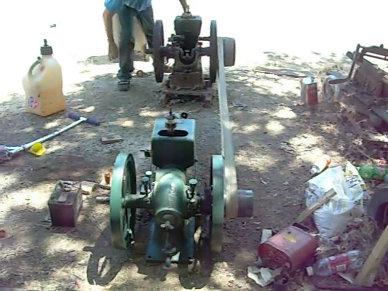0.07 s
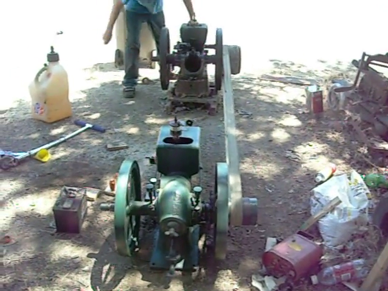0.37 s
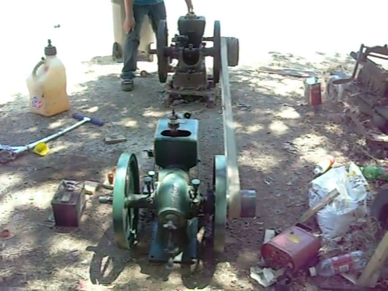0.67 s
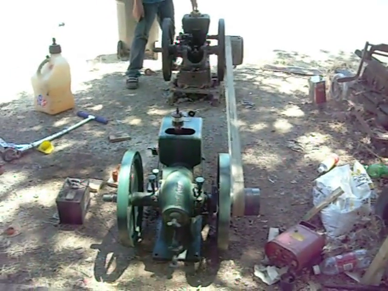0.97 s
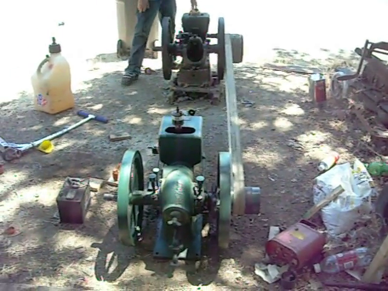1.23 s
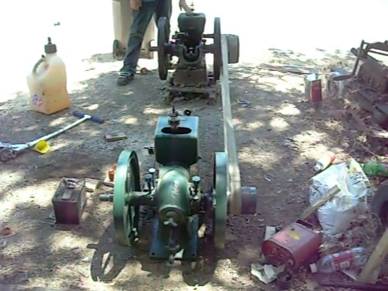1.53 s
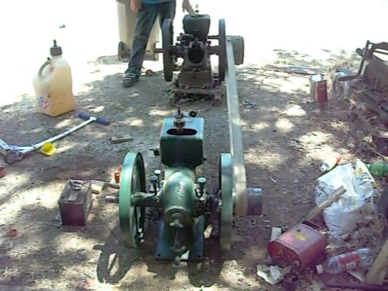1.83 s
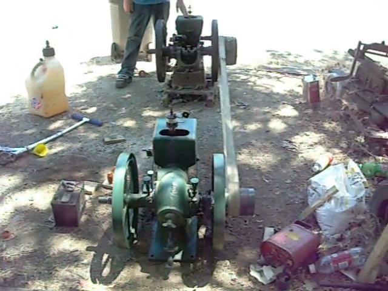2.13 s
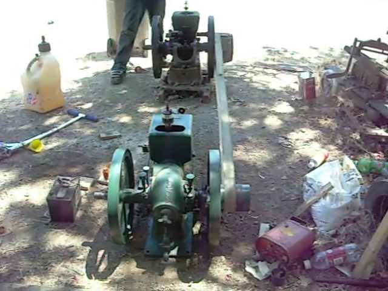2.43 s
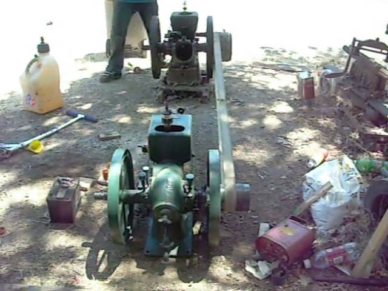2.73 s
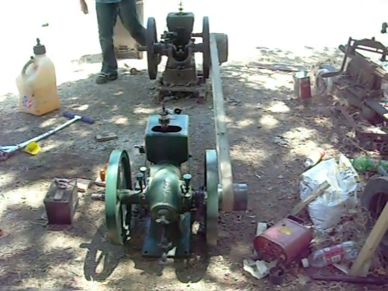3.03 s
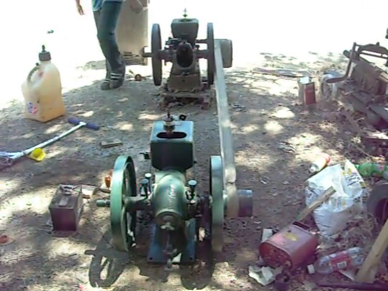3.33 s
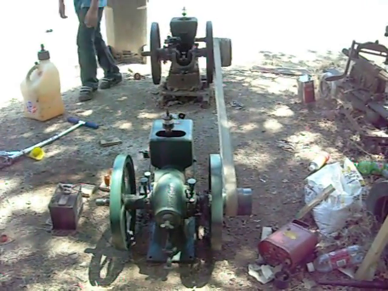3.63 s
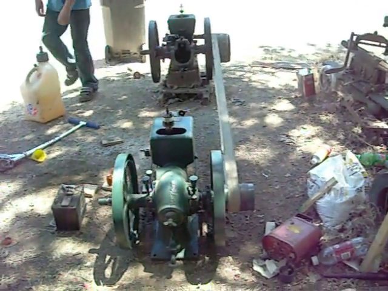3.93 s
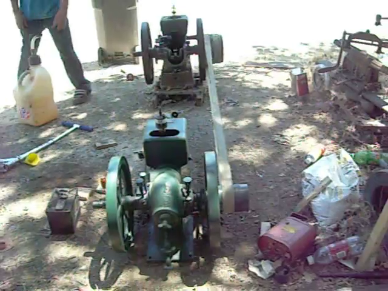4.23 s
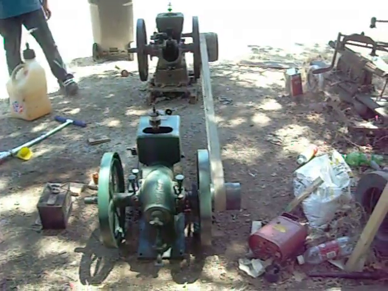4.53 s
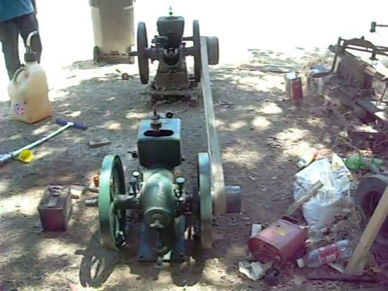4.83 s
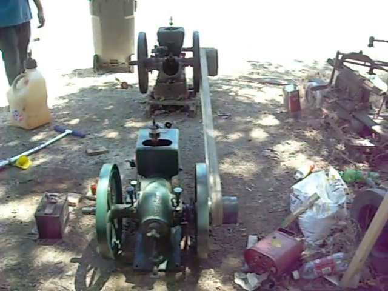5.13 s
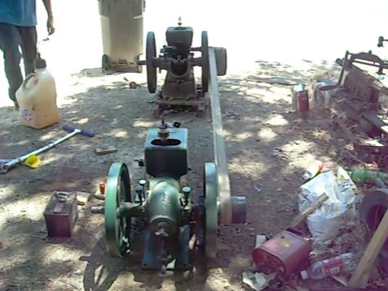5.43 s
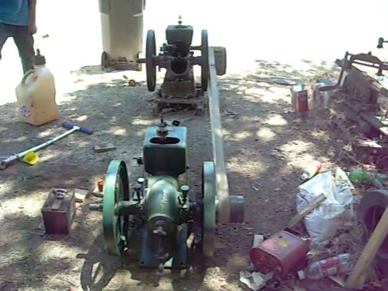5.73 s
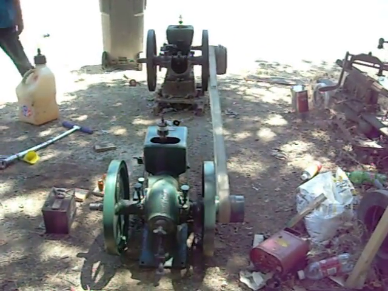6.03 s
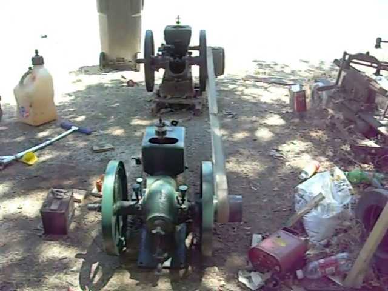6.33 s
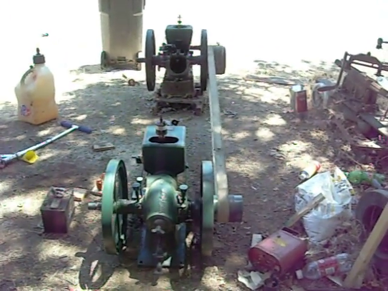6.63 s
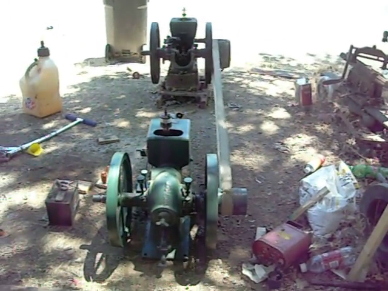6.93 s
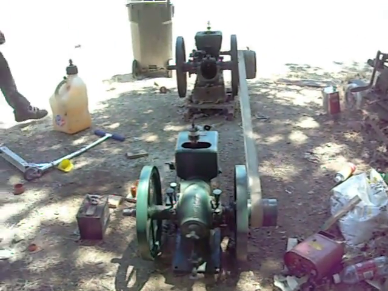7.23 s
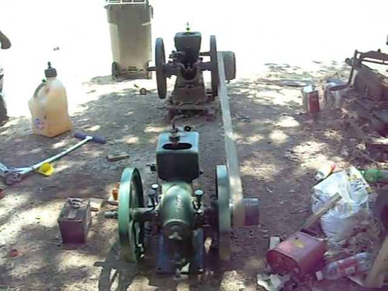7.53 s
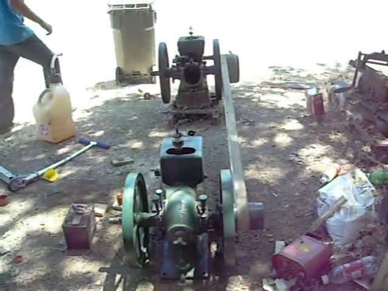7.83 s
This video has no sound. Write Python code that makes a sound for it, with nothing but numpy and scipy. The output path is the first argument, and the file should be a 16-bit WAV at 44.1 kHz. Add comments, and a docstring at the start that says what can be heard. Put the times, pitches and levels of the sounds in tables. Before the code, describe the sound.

Steady, even firing of an old stationary engine in a yard, with sharp exhaust barks, iron clatter and a faint belt whirr.

```python
"""Knock, bark and boom, about two and a half times a second: an old single-cylinder engine in a yard.
In each cycle, impacts excite the modes of the cast frame, tappet, valve and timing gears; escaping gas
rings the silencer's shell, lifts its lid and sets the air in the exhaust oscillating.
A loose steel part pings now and then over the whirr of belt and flywheels. The yard and far walls
reflect the sound, and a narrow-band microphone overloads on the loudest blows."""
import sys
import numpy as np
from scipy import signal
from scipy.fft import rfft, irfft, next_fast_len
from scipy.io import wavfile
from scipy.ndimage import map_coordinates

SR = 44100
rng = np.random.default_rng(int(sys.argv[2]) if len(sys.argv) > 2 else 0)


def dump_mix(stems):
    """Bounce the given channels to the path in sys.argv[1] as a 16-bit WAV at rate SR."""
    frames = np.atleast_2d(stems).T  # one column per channel
    limited = np.clip(frames, -1, 1)  # hard clip at full scale
    pcm = np.round(limited * 32767).astype(np.int16)
    wavfile.write(sys.argv[1], SR, pcm)


N = 356769
T = np.arange(SR // 3) / SR  # time within one blow, t/s

# frame impacts: t/s from the exhaust valve's opening, ring level/dB, crack level/dB, crack t60/s
FRAME_IMPACTS = [(-.1205, -30.5, -23.5, .03), (-.116, -15.5, 0, 0.027), (-.108, -26, -13, 0.071)]
# spectra of the cracks of valve and gears: f/Hz, relative density level/dB
VALVE_SPECTRUM = [(100, -20.5), (500, -28), (1400, -12.5), (2300, -14.5), (3100, -5), (4000, -21)]
GEAR_SPECTRUM = [(40, -32.5), (200, -15.5), (500, -4), (850, -5), (1550, 0), (2400, -5.5), (3100, -3),
                 (4000, -1)]


def bark():
    """Turbulent gas excites the silencer's shell resonances: a short blowdown, then the piston's sweep."""
    # gas rushing past the valve: f/Hz, relative density level/dB
    rush_spectrum = [(60, -47), (200, -16.5), (450, -14), (850, -10.5), (1500, -6.5), (2300, -7),
                     (3000, -3.5), (3600, -3.5), (4200, -2)]
    # shell resonances: f/Hz, bandwidth/Hz, peak gain/dB
    resonances = [(1110, 50, 6), (1550, 53, 3.5), (1690, 90, 0.5), (1973, 150, 5), (2400, 41, 1),
                  (2474, 45, 9.5), (2865, 170, 4.5), (3057, 110, 8), (3530, 200, 5), (3260, 190, 1.5),
                  (3650, 84, 6.5)]
    opens = valve_openings()
    shell = lambda hz: amp(sum(db / (1 + (2 * (hz - f0) / width) ** 2) for f0, width, db in resonances))
    gas = unit(filtered(noise(rush_spectrum, (len(opens), len(T))), shell))
    blowdown = held(level_db=-2.5, hold=.013, t60=.1)
    sweep = held(level_db=-24, hold=.1, t60=.1)
    delay_s, attack_s = .0028, .00057  # the valve lifts and the gas breaks out
    flow = np.maximum(blowdown, sweep) * (1 - np.exp(-T / attack_s))
    blast_db, _ = accents(opens)
    strength = amp(blast_db + .3 * rng.standard_normal(len(opens)))
    return placed(opens + delay_s, strength[:, None] * gas * flow)


def exhaust_boom():
    """Sudden release sets the exhaust's air in free oscillation; most gas leaves as one heavy shove."""
    # air modes at release, and the shove's pulse: f/Hz, level/dB, t60/s, rise/s
    air_modes = [(66.2, -11.5, 0.069, 0.0087), (127.6, -18.5, .13, .012), (161.3, -5.5, 0.13, 0.044),
                 (235.3, -32.5, 0.47, 0.00088), (254.2, -30, 0.32, .001), (276.4, -19, .16, 0.0026),
                 (320.8, -16.5, 0.096, 0.00044), (411, -26.5, 0.23, 0.00086)]
    shove = [(95, -13.5, 0.017, 0.0034), (28, -26, 0.095, 0.0014)]
    return puff(air_modes, delay=0, scatter_db=0 + 1.5) + puff(shove, delay=.012)


def exhaust_honk():
    """The piston's second push excites the air column again."""
    # air modes: f/Hz, level/dB, t60/s, rise/s
    air_modes = [(75, -30, 0.043, 0.0008), (257.3, -28, 0.073, 0.00073), (328, -9, 0.088, 0.0095),
                 (354.3, -29, 0.12, 0.0013)]
    return puff(air_modes, delay=.0655, scatter_db=2.2, jitter_s=.00058)


def puff(modes, delay, scatter_db=0, jitter_s=0):
    """Impulse response of an air column: a slug of gas starts damped oscillations in every cycle."""
    opens = valve_openings()
    swings = np.array([-damped(*mode) for mode in modes])
    sizes = amp(scatter_db * rng.standard_normal((len(opens), len(modes))))
    return placed(opens + delay + jitter_s * rng.standard_normal(len(opens)), sizes @ swings)


def lid():
    """Each blast's pressure lifts the silencer's lid, which clanks in its own modes."""
    # lid modes: f/Hz, level/dB, t60/s
    modes = [(1770, 7.5, 0.045), (2785, 2, 0.054)]
    opens = valve_openings()
    _, clank_db = accents(opens)
    db = -15 + clank_db + 2.5 * rng.standard_normal(len(opens))
    return placed(opens + .0073, amp(db)[:, None] * ringing(modes, rise=.0038))


def valve_openings():
    """The governor hunts, so the exhaust valve's opening times drift about an even beat."""
    # crank's lag behind the beat: t/s, lag/s
    hunting = [(.2, .0042), (2.23, -.0014), (2.63, -0.0046), (4.65, -0.00098), (5.6, 0.0037),
               (6.26, 0.0023), (7.06, -.0012), (7.47, 0.0023), (7.87, 0.0011)]
    first_s = .2224
    beat = first_s + CYCLE_S * np.arange(-1, N / SR / CYCLE_S)
    return beat + np.interp(beat, *np.transpose(hunting))


def accents(opens):
    """Cycle-to-cycle variation: level offsets of blast and lid, zero except on a few hard firings."""
    # hard firings: t/s, blast offset/dB, lid offset/dB
    hard_firings = [(1.028, 1.5, -1), (1.43, 0.5, 9.5), (2.233, .5, 3.5), (4.247, 2, -2.5),
                    (6.262, 3, -7.5), (7.064, 1.5, 0)]
    hard = np.array(hard_firings)
    same_cycle = np.abs(opens[:, None] - hard[:, 0]) < CYCLE_S / 2
    return (same_cycle @ hard[:, 1:]).T


def knock():
    """Structure-borne sound: the firing knock excites the modes of the cast frame."""
    # frame modes and crack spectrum: f/Hz, relative level/dB
    modes = [(759, -14.5), (1232, 2.5), (1324, -2), (1625, 6.5), (1857, -18.5), (2002, -5), (2153, 3),
             (2255, -19), (2444, 4.5), (2557, 2.5), (2858, 1), (2960, -6), (3143, -15.5), (3396, -26.5),
             (3445, -14.5), (3552, -1.5), (3622, 7.5), (3779, 2)]
    spectrum = [(30, -14), (170, -11), (380, -22.5), (750, -6), (1300, -6.5), (2600, -1), (3450, 3.5),
                (4200, -4)]
    return struck(FRAME_IMPACTS, modes, spectrum, t60=.09, rise=.0014, alike=.6, scatter_db=.4)


def jolt():
    """The firing's reaction force jolts the frame on its base: a heavily damped thud under the knock."""
    # modes of the frame on its base: f/Hz, level/dB, t60/s, rise/s
    modes = [(110, -25, 0.009, 0.00057), (428, -24.5, .015, 0.00041), (763, -23.5, .02, .0005)]
    times = valve_openings() + FRAME_IMPACTS[1][0]  # with the strongest impact
    thud = sum(damped(*mode) for mode in modes)
    return placed(times, np.tile(thud, (len(times), 1)))


def tappet():
    """Brief contacts excite the tappet's fast-decaying modes: a tick."""
    # contacts: t/s from valve opening, ring level/dB, crack level/dB, crack t60/s
    impacts = [(-.2031, -28, -22.5, .04), (-.1676, -33.5, -9.5, .03), (-.1608, -19.5, -7, 0.019),
               (-.0596, -18, -2.5, 0.022), (-.0561, -22, -28, 0.065)]
    # tappet modes and crack spectrum: f/Hz, relative level/dB
    modes = [(1028, -27.5), (1351, 0), (1512, 0), (1857, -2), (2627, -4.5), (2750, -9.5), (3143, -3),
             (3396, 2.5), (3827, -0.5)]
    spectrum = [(100, -20.5), (500, -29), (1000, -9), (1450, -26.5), (2150, -7.5), (2700, -4.5), (3900, 2)]
    return struck(impacts, modes, spectrum, t60=.038, rise=.0002, alike=.45, scatter_db=1)


def valve():
    """Impacts excite the valve's high, strongly damped modes: a click."""
    # contacts: t/s from valve opening, ring level/dB, crack level/dB, crack t60/s
    impacts = [(-.033, -23.5, -24.5, 0.063), (-.019, -23.5, -31.5, .07), (-.0054, -10, -17.5, 0.0098),
               (.0648, -12.5, -11, 0.05), (.0845, -37.5, -11, .03), (.161, -33.5, -28, 0.11)]
    # valve modes: f/Hz, relative level/dB
    modes = [(2080, -28), (3270, -17), (3540, -14.5), (3650, -13), (3790, -21)]
    return struck(impacts, modes, VALVE_SPECTRUM, t60=.032, rise=.0007, alike=.55, scatter_db=1)


def gears():
    """A quick series of impacts rings the timing gears; the decays overlap into a clatter."""
    # contacts: t/s from valve opening, ring level/dB, crack level/dB, crack t60/s
    impacts = [(0.0555, -16.5, -6, 0.037), (.07, -28.5, -8.5, 0.045), (.079, -40.5, -17, 0.037),
               (.1, -31, -13.5, 0.095), (.106, -29, -18.5, .05), (0.135, -34, -15.5, 0.052)]
    # gear modes: f/Hz, relative level/dB
    modes = [(759, -5), (888, 0.5), (958, -4.5), (1092, -21), (1593, -1.5), (1803, -9), (2013, -6.5),
             (2121, -7.5), (2282, 2), (2530, -4.5), (2971, -2.5), (3176, -16), (3563, -3), (3881, 7.5)]
    return struck(impacts, modes, GEAR_SPECTRUM, t60=.079, rise=.00033, alike=.082, scatter_db=.3,
                  jitter_s=.0005)


def struck(impacts, modes, spectrum, t60, rise, alike, scatter_db, jitter_s=.0004):
    """Modal superposition in iron hit every cycle: distinct modes ring, dense ones merge into a crack."""
    opens = valve_openings()
    hz, db = np.transpose(modes)
    sizes = amp(db) / np.sqrt(np.sum(amp(db) ** 2) / 2)
    track = np.zeros(N)
    for delay, ring_db, crack_db, crack_t60 in impacts:
        tones = np.sin(2 * np.pi * (hz[:, None] * T + rng.random((len(hz), 1))))
        ring = sizes * amp(2 * rng.standard_normal((len(opens), len(hz)))) @ tones
        # alike is the share of the crack's power that repeats at every blow
        repeated = np.sqrt(alike) * noise(spectrum, len(T))
        crack = repeated + np.sqrt(1 - alike) * noise(spectrum, (len(opens), len(T)))
        blows = amp(ring_db) * ring * fade(t60, rise) + amp(crack_db) * crack * fade(crack_t60, rise)
        force, late = rng.standard_normal((2, len(opens)))
        track += placed(opens + delay + jitter_s * late, blows * amp(scatter_db * force)[:, None])
    return track


def pings():
    """A shaken, loose steel part clicks on contact and rings at its natural frequencies."""
    # contacts: t/s, level/dB
    shakes = [(1.009, -12.5), (2.4406, -12.5), (2.9626, -21.5), (3.8034, -13), (5.1028, -14.5),
              (6.3718, -13), (6.471, -19), (7.613, -15.5), (8.05, -22.5)]
    # steel part's modes: f/Hz, level/dB, t60/s
    modes = [(1630, -16.5, .13), (2980, -4.5, 0.12), (3170, -12.5, .08), (3520, -3, .08), (3570, -8, 0.039)]
    times, db = np.transpose(shakes)
    crack = noise(VALVE_SPECTRUM, (len(times), len(T))) * fade(t60=.035, rise=.0004)
    return placed(times, amp(db)[:, None] * (ringing(modes, rise=.00034) + crack))


def clink():
    """Free vibration of a small piece of metal, struck once."""
    # its modes: f/Hz, level/dB, t60/s
    modes = [(2030, 3, 0.027), (2200, -13, .03)]
    return placed(times=[7.231], sounds=amp(-18.5) * ringing(modes, rise=.001)[None])


def rattle(level_db, spread_db, t60, count):
    """Random light impacts in worn joints and the belt's lacing radiate broadband ticks."""
    when, weakness = rng.random((count, 2)).T
    ticks = noise(GEAR_SPECTRUM, (count, len(T))) * fade(t60, rise=.0003)
    return placed(when * N / SR, ticks * amp(level_db - spread_db * weakness)[:, None])


def belt(level_db, flutter_db, flap_hz):
    """The flapping flat belt modulates the amplitude of the running gear's whirr."""
    # whirr of belt and flywheels: f/Hz, relative density level/dB
    spectrum = [(25, -19), (70, -11.5), (150, -2.5), (240, 0.5), (400, -7), (850, 1.5), (1500, 0.5),
                (2200, -5.5), (3100, 0.5), (4000, -7.5)]
    flaps = rng.standard_normal(int(N * flap_hz / SR) + 4)
    flutter = map_coordinates(flaps, [np.arange(N) * flap_hz / SR])
    return amp(level_db + flutter_db * flutter) * noise(spectrum, N)


def walls(x, cutoff_hz=130):
    """Far walls reflect single late echoes; the longest waves diffract around them and are lost."""
    # reflections: delay/s, level/dB
    reflections = [(.094, -11), (.225, -24)]
    echoes = lambda hz: sum(amp(db) * np.exp(-2j * np.pi * hz * delay) for delay, db in reflections)
    return filtered(x, lambda hz: echoes(hz) * (1 - np.exp(-(hz / cutoff_hz) ** 4)))


def yard(x, rise_s=.0047):
    """Scattering from the ground, junk and trees makes a short diffuse reverberation."""
    # reverberation time: f/Hz, t60/s
    decay_times = [(150, 0.071), (400, 0.34), (1000, 0.49), (4000, .3)]
    hz, t, spectra = signal.stft(rng.standard_normal(SR // 2), SR, nperseg=256)
    decay = np.exp(-np.log(1000) * t / along(decay_times, hz)[:, None])
    tail = signal.istft(spectra * decay, SR, nperseg=256)[1]
    tail *= 1 - np.exp(-np.arange(len(tail)) / SR / rise_s)
    return signal.fftconvolve(x, tail / np.linalg.norm(tail))[:N]


def amp(db):
    """Level in decibels to amplitude ratio."""
    return 10 ** (np.asarray(db) / 20)


def unit(x):
    """Normalise to rms 1."""
    return x / np.sqrt(np.mean(x ** 2) + 1e-20)


def along(points, hz):
    """Interpolate (f/Hz, value) points on a logarithmic frequency axis."""
    f, values = np.transpose(points)
    return np.interp(np.log(hz + 1), np.log(f), values)


def filtered(x, gain):
    """Linear filtering: the spectrum of x times a frequency response."""
    size = x.shape[-1]
    padded = next_fast_len(size + size // 16)
    return irfft(rfft(x, padded) * gain(np.fft.rfftfreq(padded, 1 / SR)), padded)[..., :size]


def noise(spectrum, shape):
    """Gaussian noise shaped to a spectrum, at rms 1."""
    return unit(filtered(rng.standard_normal(shape), lambda hz: amp(along(spectrum, hz))))


def fade(t60, rise):
    """A quick swell and an exponential decay of 60 dB in t60 seconds."""
    return np.exp(-np.log(1000) * T / t60) * (1 - np.exp(-T / rise))


def held(level_db, hold, t60):
    """A plateau followed by exponential decay."""
    return amp(level_db) * np.exp(-np.log(1000) * np.maximum(T - hold, 0) / t60)


def damped(hz, db, t60, rise):
    """One mode: a damped harmonic oscillation."""
    return amp(db) * np.sin(2 * np.pi * hz * T) * fade(t60, rise)


def ringing(modes, rise):
    """Superposition of modes with a common rise time."""
    return sum(damped(hz, db, t60, rise) for hz, db, t60 in modes)


def placed(times, sounds):
    """Superpose sounds on one track, each starting at its time."""
    at = np.round(np.asarray(times) * SR).astype(int)[:, None] + np.arange(len(T))
    inside = (at >= 0) & (at < N)
    return np.bincount(at[inside], sounds[inside], N)


def scene():
    """The engine's direct sound adds to its reflections from the yard."""
    boom = exhaust_boom()
    honk = exhaust_honk()
    metal = bark() + lid() + knock() + tappet() + valve() + gears() + pings() + clink() + jolt()
    whirr = belt(level_db=-32, flutter_db=2.1, flap_hz=60)
    ticks = rattle(level_db=-19.5, spread_db=4.5, t60=.026, count=260)
    reverberation = amp(-14.5) * yard(metal + amp(-4.5) * boom)
    return (boom + honk + metal + whirr + ticks + walls(boom) + reverberation)[None]


def record(dry):
    """Nonlinear distortion: a narrow-band microphone channel overloads, making all the top treble."""
    # frequency responses before and after the overload: f/Hz, gain/dB
    input_response = [(3800, 2.5), (4100, 0), (4300, -11.5), (4500, -24), (4800, -63.5), (5500, -95.5)]
    output_response = [(4500, 0), (10000, -1.5), (12000, -2), (16000, 0)]
    ceiling, top_hz = .73, 16000
    narrow = filtered(dry, lambda hz: amp(along(input_response, hz)))
    clipped = np.clip(narrow, -ceiling, ceiling)
    return filtered(clipped, lambda hz: amp(along(output_response, hz)) * (hz < top_hz))


CYCLE_S = .4025  # period of the engine

dry = scene()
out = record(dry)
dump_mix(out)
```